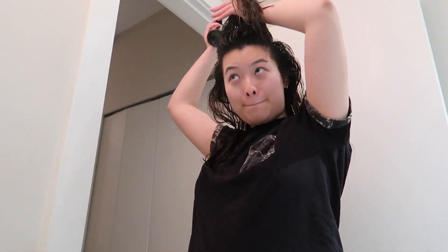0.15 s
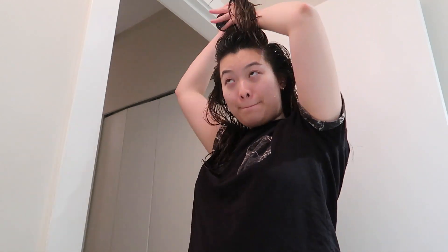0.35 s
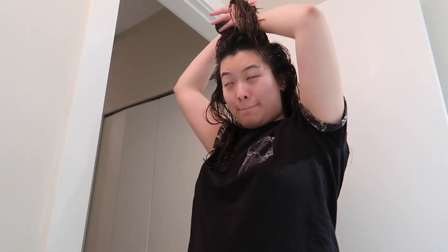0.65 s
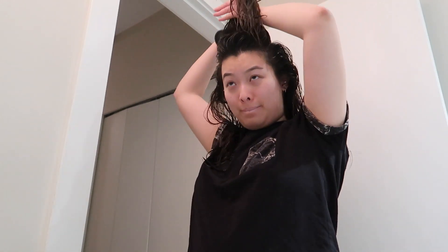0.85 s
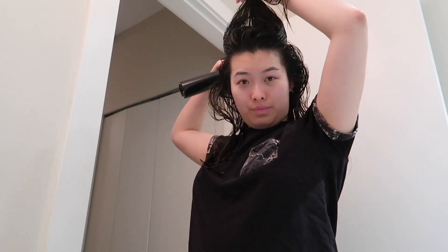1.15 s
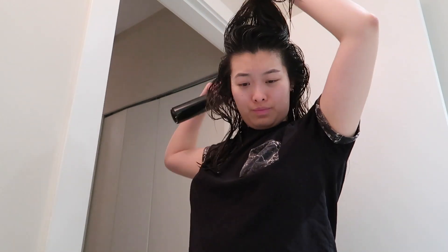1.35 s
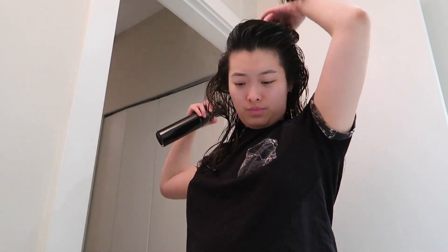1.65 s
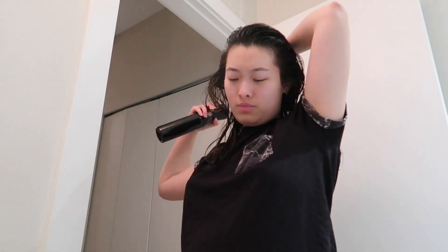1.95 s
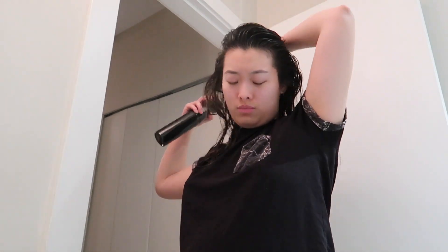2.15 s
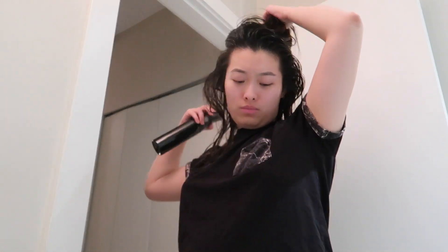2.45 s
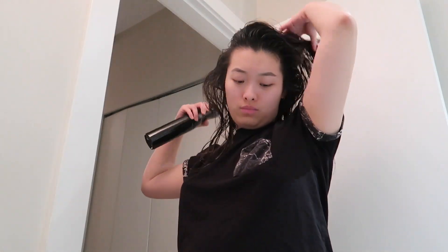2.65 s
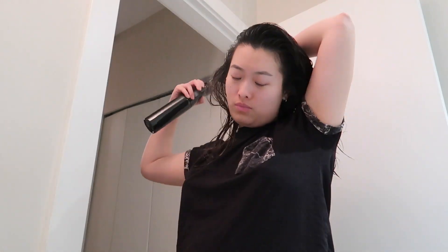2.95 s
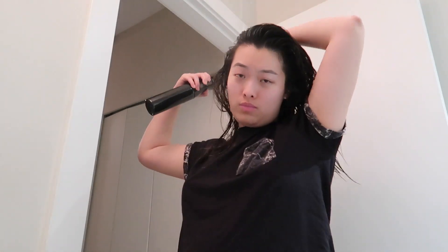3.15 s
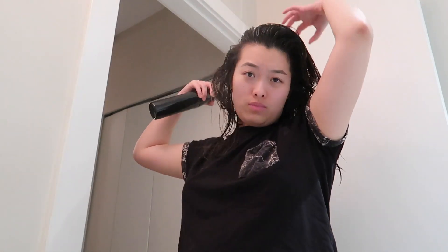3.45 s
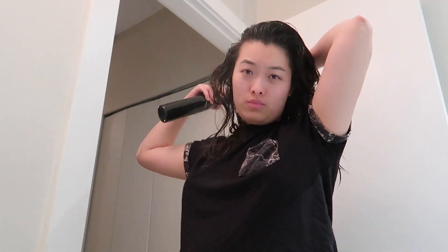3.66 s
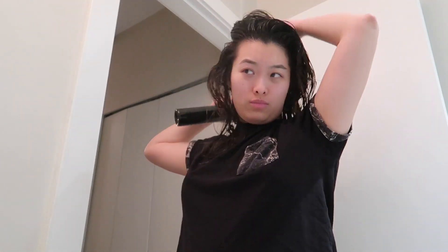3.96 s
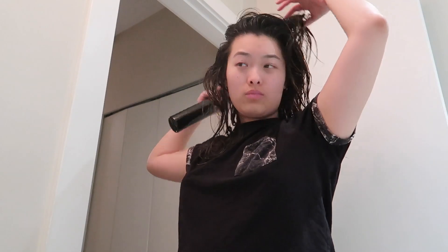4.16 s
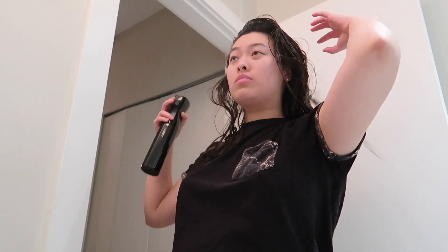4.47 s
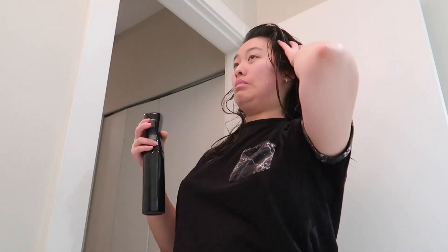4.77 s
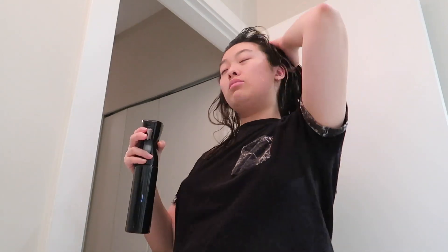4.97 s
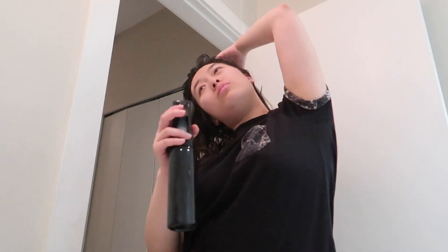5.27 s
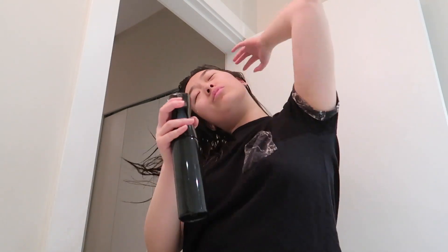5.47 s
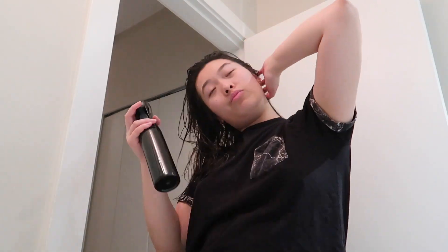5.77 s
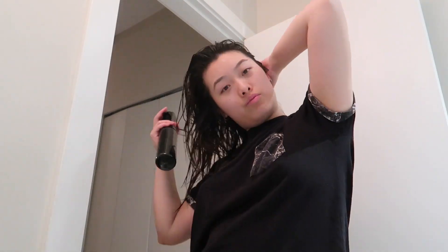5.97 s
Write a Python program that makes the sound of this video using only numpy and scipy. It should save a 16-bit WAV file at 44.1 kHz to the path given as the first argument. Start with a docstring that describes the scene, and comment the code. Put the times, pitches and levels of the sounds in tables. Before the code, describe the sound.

Close up in a small hard room, a spray bottle's trigger clicks and knocks around a steady soft mist hiss, with a faint motor hum.

```python
"""A small hard room: close in front of a mid-side microphone, a pump mister sprays fine water mist.
A ceiling fan motor hums in low, slowly drifting lines and rumbles as low noise, over the air noise of the room.
The trigger's plastic lever and piston click and knock: taps and rattles ring resonances of the hollow bottle.
The nozzle hisses as coloured noise, with sputter through the hollow and fine grit.
Clicks and knocks return from the room as decaying noise tails, separate in the mid and side capsules."""
import sys
import numpy as np
from scipy import signal
from scipy.fft import rfft, irfft, next_fast_len
from scipy.io import wavfile
from scipy.ndimage import uniform_filter1d, map_coordinates

SR = 44100
rng = np.random.default_rng(int(sys.argv[2]) if len(sys.argv) > 2 else 0)


def digitize_waveform(pressure):
    """Quantize a signal to 16-bit integers and store it at the path in sys.argv[1].

    Rows of a 2-D input are taken as channels; values are limited to [-1, 1].
    """
    field = np.atleast_2d(pressure).T
    bounded = np.clip(field, -1, 1)
    quanta = np.round(bounded * 32767).astype(np.int16)
    wavfile.write(sys.argv[1], SR, quanta)


N = 269873  # length [samples]

# Late decay of the room: (frequency [Hz], T60 [s])
ROOM_DECAY = [(300, 0.48), (1000, 0.46), (3000, 0.5), (10000, 0.26)]
# Capsule responses to clicks and knocks, mid then side: (frequency [Hz], gain [dB])
MID_CAPSULE = [(6000, -0.5), (10500, -8), (12500, -18), (15000, -46)]
SIDE_CAPSULE = [(300, -23), (1000, -23), (2500, -15), (3600, -14), (4200, -4), (5500, -1), (8000, 5),
                (13000, -1)]
TOP_HZ = 15466  # band limit of the recorder

# Spectral shape of the room air, mid then side: (frequency [Hz], relative level [dB])
AIR_MID = [(47, -55), (80, -9), (102, -9.5), (127, -9.5), (148, -10), (173, -12), (398, -15), (518, -19),
           (1070, -23), (1170, -22), (1460, -23.5), (4090, -32.5), (5800, -35.5), (11800, -46.5),
           (15300, -72)]
AIR_SIDE = [(12, -35), (20, -57), (136, -4), (531, -2.5), (593, -16), (721, -9.5), (2250, -17), (4510, -21),
            (11300, -32.5), (14100, -39), (15300, -61)]
# Fan motor lines: (frequency [Hz], mean level [dB rms], unsteadiness [dB], which also scales phase drift)
MOTOR_LINES = [(120, -43.5, 0.6), (57.5, -96, -2), (178, -70, 0)]
# Fan rumble over time: (time [s], level [dB])
RUMBLE_LEVEL = [(0, -58.5), (1.5, -56), (3, -61), (4.4, -58), (5.2, -53.5), (6.12, -58)]
# Spectral shape of the rumble: (frequency [Hz], relative level [dB])
RUMBLE_SPECTRUM = [(15, -34), (25, 11.5), (45, 2), (60, 15), (80, -21), (110, -47)]

# Trigger clicks: (time [s], blow level [dB], pitch stirred in the hollow [Hz], then relative to the blow
# hollow [dB], wall [dB], shoulder [dB], head [dB], and room tail relative to the direct sound [dB])
CLICKS = [(0.157, -41, 910, -8.5, -10, -14, -13.5, 8.5), (0.33, -32, 990, -10, -38, -17, -26, -3),
          (0.338, -26.5, 950, -1, -18, -9, -4, -1.5), (0.374, -33, 930, -4, -11.5, -17, -24, -1),
          (0.41, -32, 960, -7, -29, -26, -17, -3), (0.547, -34.5, 900, -10.5, -13, -20, -14.5, 4.5),
          (0.573, -27.5, 850, -8, -13.5, -20, -22, 2.5), (0.597, -33.5, 1180, -7, -26, -17, -17, 3),
          (0.717, -31.5, 850, -8.5, -12, -17, -19, 1), (0.738, -35.5, 850, -19, -15, -12, -20, 4),
          (0.781, -14.5, 880, -9.5, -12, -20, -19.5, 3), (0.82, -29.5, 1010, -6.5, -15, -14, -28, -1),
          (0.878, -35, 880, -3, -22, -25, -28, -7), (0.923, -37, 1060, -6.5, -16, -10.5, -19, 3),
          (1.045, -41.5, 830, -4.5, -4, -9, -3.5, 3), (1.081, -37.5, 964, -6.5, -18, -16, -21, 5),
          (1.151, -29, 1000, -14.5, -16, -13, -17, 4), (1.188, -38, 1060, -14, -18, -18, -8, 3),
          (1.247, -38.5, 910, -17, -21, -17, -7, 1), (1.384, -30, 1000, -6.5, -14.5, -9.5, -16, 7.5),
          (1.417, -36, 896, -17, -7, -18, -9, 2), (1.641, -25.5, 980, -14.5, -12, -11.5, -14, 4.5),
          (1.769, -28, 940, -17, -13, -7, -22, 5), (1.79, -29, 990, -9, -22, -20, -23, -1),
          (1.905, -31, 1020, -2.5, -25, -21, -21, -0.5), (1.941, -29.5, 1040, -13, -14, -13.5, -17, 8.5),
          (2.069, -29, 1150, -10.5, -12.5, -10, -22, 2), (2.196, -33, 1040, -3.5, -23, -12, -12, -0.5),
          (2.304, -34.5, 980, -10, -7.5, -14, -14, -2), (2.418, -32.5, 940, -12, -14, -37, -20, -1),
          (2.52, -26, 950, -13, -19, -18, -18, 6), (2.565, -27, 955, -8.5, -15, -12.5, -16, 3.5),
          (2.731, -33, 910, -7, -13, -14, -10, 0), (2.826, -25.5, 1090, -7, -14, -11, -13.5, 1.5),
          (2.905, -27, 960, -12.5, -15.5, -24, -13, 4), (3.032, -31, 1160, -7, -11.5, -16, -19, -8),
          (3.107, -31, 1000, -5, -25, -23, -14, 5.5), (3.158, -32.5, 910, -16, -8.5, -11, -9, 4),
          (3.29, -31, 940, -18.5, -28, -12, -17, 2), (3.324, -30, 910, -8.5, -17, -9, -25, -9),
          (3.367, -33, 990, -6.5, -17, -7, -15, 7), (3.402, -26, 980, -9, -19, -16, -12, 3),
          (3.56, -33.5, 1010, -8, -21, -18, -11, 7.5), (3.665, -29, 1130, -9.5, -15, -12, -28, 8.5),
          (3.861, -31, 925, -5.5, -14, -41, -28, 8.5), (3.958, -28, 1110, -9, -13.5, -13.5, -17, 6.5),
          (4.131, -35.5, 945, -3, -11, -22, -17, 5), (4.24, -34, 1140, -8, -28, -31, -21, 14.5),
          (4.262, -39, 980, -12, -24, -11, -12, 11), (4.287, -32, 980, -6.5, -11, -9.5, -12, 4),
          (4.31, -38.5, 990, -15, -10, -16, -10, 4.5), (4.692, -44, 861, -16, -8, -13, -18, 9),
          (4.709, -36.5, 1070, -6, -6.5, -22, -25, 0.5), (4.763, -32, 980, -6.5, -27, -17, -15, -1.5),
          (4.768, -37.5, 850, -8, -16, -16, -13.5, 5), (4.814, -38.5, 1320, -4.5, -11, -29, -21, 5.5),
          (4.819, -36.5, 1080, -14, -9.5, -26, -30, -7), (4.836, -41.5, 1090, -19, -5, -24, -22, -1),
          (4.928, -45, 830, -3.5, -26, -23, -12, 5), (5.222, -38, 1130, -9, -8, -20, -7.5, 1.5),
          (5.309, -32.5, 1040, -6.5, -5.5, -15, -15.5, -1), (5.321, -38, 920, -8, -24, -18, -15, 0),
          (5.422, -39.5, 1120, -10, -5.5, -12, -18, 2), (5.461, -34.5, 1020, -1.5, -9, -14, -21.5, -1.5),
          (5.526, -39, 1120, -4.5, -9, -6.5, -7, 0.5), (5.582, -44, 999, -13, -18, -18, -13, -1),
          (5.719, -43, 1150, -10, -26, -20, -12, 4), (5.789, -30, 875, -7, -19, -14, -14, 2),
          (5.795, -33, 800, -22, -18, -23, -12.5, 0), (5.905, -38.5, 869, -6.5, -13, -23, -17, 1),
          (5.966, -34.5, 1300, -6, -4, -11, -10.5, 4), (5.975, -39, 1450, -5, -3, -16, -11, -1.5)]
# Piston knocks in the bottle's air: (time [s], level [dB], pitch [Hz])
KNOCKS = [(0.573, -42, 570), (0.782, -36.5, 509), (1.214, -38.5, 308), (1.394, -42, 424),
          (1.651, -40.5, 407), (1.94, -47, 421), (2.569, -38.5, 426), (2.831, -42, 403),
          (3.105, -46.5, 424), (3.409, -39, 398), (3.674, -53, 448), (4.27, -62, 460)]
KNOCK_T60_S = 0.1
# Resonances of the bottle's hollow, wall, shoulder and base, then of the pump head, trigger spring
# and nozzle orifice: (frequency [Hz], width [Hz], relative gain per pass [dB])
HOLLOW = [(825, 56, -6), (905.5, 12.3, 4.5), (964, 56, -2.5), (990, 24, 5), (1040, 96, -8.5), (1141, 41, 1),
          (1248, 55, -11), (1361, 91, 0), (1473, 490, -5)]
WALL = [(1840, 140, -9), (2061, 42, 3.5), (2260, 106, -2.5), (2470, 65, -7)]
SHOULDER = [(2583, 175, 0.21), (2800, 266, -0.7), (3043, 323, -4)]
BASE = [(356, 137, -2.5), (443, 114, 5), (677, 78, -3.5)]
HEAD = [(3450, 560, 0), (4630, 1220, -3.5), (5300, 520, -6)]
SPRING = [(5700, 2400, -1.4), (9200, 11000, -0.66)]
ORIFICE = [(5660, 1040, -6.5)]
# Level added to each part on every click: hollow [dB], wall [dB], shoulder [dB], head [dB]
PART_TRIM = [0.33, 2.37, 3, 1.5]
REFERENCE_BLOW_DB = -35  # blow level at which the spring and wall levels are stated
BASE_DB, SPRING_DB = -15, -11  # base relative to the hollow, spring relative to the head at the reference
SPRING_GROWS = 0.7  # extra spring level per dB of harder blow [dB/dB]
WALL_THUD_DB = -5  # thud under the wall's ring at the reference blow
WALL_CLEARS = 0.6  # drop of the wall's thud per dB of harder blow [dB/dB]
PICK_HZ = 274  # width of the band of hollow modes that one click stirs
SCATTER_DB = 2  # spread of mode strengths from blow to blow, per pass
ONSET_S, CHATTER_S = 0.0022, 0.0046  # time constants of the rattle's rise and decay

# The jet opens fast, falters once, sags and shuts: (time [s], flow level before the layer gains [dB])
SPRAY = [(1.12, -75), (1.18, -53.5), (1.3, -54), (2.22, -55), (2.27, -59.5), (2.31, -54), (3.99, -54.5),
         (4.28, -57), (4.4, -89)]
# Spectral shape of the nozzle hiss, mid then side: (frequency [Hz], relative level [dB])
HISS_MID = [(290, -14), (500, -17), (675, -18.5), (980, -9), (1270, -10.5), (1460, -7.5), (1740, -11),
            (2060, -7.5), (2710, -5.5), (3700, -7.5), (4280, -11), (5400, -9), (6800, -15.5), (10500, -20),
            (12500, -35.5), (15300, -99)]
HISS_SIDE = [(410, -36), (700, -6), (1500, -27), (2420, -17), (2970, -14), (3800, 9.5), (5520, 12),
             (11400, 9), (12900, 11), (15300, -11)]


def amp(db):
    """Decibels to gain."""
    return 10 ** (np.asarray(db) / 20)


def unit(x):
    """Scaled to rms 1."""
    return x / np.sqrt(np.mean(x ** 2) + 1e-20)


def peak(x):
    """Scaled to peak 1."""
    return x / np.max(np.abs(x))


def along(points, hz):
    """(frequency [Hz], value) points read on a log frequency axis."""
    f, v = np.transpose(points)
    return np.interp(np.log(hz + 1), np.log(f + 1), v)


def wobble(rate):
    """A smooth random curve through a given number of knots a second."""
    knots = rng.standard_normal(int(N * rate / SR) + 4)
    return map_coordinates(knots, [np.arange(N) * rate / SR])


def filtered(x, response):
    """x shaped by a complex response of frequency."""
    m = next_fast_len(x.shape[-1] + 8192)
    spectrum = rfft(x, m) * response(np.fft.rfftfreq(m, 1 / SR))
    return irfft(spectrum, m)[..., :x.shape[-1]]


def rush(spectrum, patchy_db):
    """Coloured noise of rms 1, with smooth patches of random gain in time and frequency."""
    z = signal.stft(rng.standard_normal(N + 512), nperseg=512)[2]
    across_hz = uniform_filter1d(rng.standard_normal(z.shape), 6, 0)
    patches = unit(uniform_filter1d(across_hz, 10, 1))
    noise = signal.istft(z * amp(patchy_db * patches), nperseg=512)[1][:N]
    return unit(filtered(noise, lambda hz: amp(along(spectrum, hz))))


def ringing(modes, scatter_db, order=2):
    """Causal response of resonances struck at new strengths; order 2 passes twice for steep skirts."""
    gains = amp(scatter_db * rng.standard_normal(len(modes)))

    def response(f):
        total = 0
        for k, (centre, width, db) in enumerate(modes):
            resonance = 1j * f * width / (centre * centre - f * f + 1j * f * width)
            total = total + (-1) ** k * gains[k] * amp(db) * resonance  # signs alternate
        return total ** order
    return response


def picked(modes, hz, width_hz, scatter_db, thud_db):
    """Narrow modes, of which a blow stirs those near hz most, over a short thud of the same band."""
    fine = ringing(modes, scatter_db, order=1)
    broad = ringing([(hz, width_hz, 0)], 0, order=1)
    return lambda f: (fine(f) + amp(thud_db) * broad(f)) * broad(f)


def place_in_room(out, s, blow, wet_db):
    """Adds a blow: direct sound, then near walls and a fresh diffuse tail in the mid and side capsules."""
    hz, t, z = signal.stft(rng.standard_normal((2, len(blow))), SR, nperseg=256)
    late = amp(-60 * t / along(ROOM_DECAY, hz)[:, None])
    early = amp(-1 - 60 * t / 0.19)  # near walls, T60 0.19 s
    tail = signal.istft(z * (late + early), SR, nperseg=256)[1]
    tail = np.pad(tail, ((0, 0), (round(0.0045 * SR), 0)))  # 4.5 ms before the first return
    tail *= amp(wet_db) / np.linalg.norm(tail)
    direct = blow * np.array([[1], [0.5]])
    heard = direct + signal.fftconvolve(blow[None], tail, axes=1)[:, :len(blow)]
    start = round(s * SR)
    out[:, start:start + len(blow)] += heard


def fan():
    """Fan motor in the mid only: slowly drifting hum lines and low rumble, over wide air noise of the room."""
    t = np.arange(N) / SR
    hum = np.zeros(N)
    for hz, db, drift_db in MOTOR_LINES:
        level = np.sqrt(2) * amp(db + drift_db * wobble(7.6))
        hum += level * np.sin(2 * np.pi * hz * t + 0.84 * drift_db * wobble(3.34))
    s, rumble_db = np.transpose(RUMBLE_LEVEL)
    rumble = amp(np.interp(t, s, rumble_db)) * rush(RUMBLE_SPECTRUM, patchy_db=1.5)
    air_mid = amp(-54.5) * rush(AIR_MID, patchy_db=1.1)
    air_side = amp(-56.5) * rush(AIR_SIDE, patchy_db=1.0)
    return np.array([hum + rumble + air_mid, air_side])


def click(db, hz, part_db):
    """A plastic contact: a tap, then a brief noisy rattle, ringing the parts of bottle and trigger."""
    t = np.arange(int(0.4 * SR)) / SR
    tap = 1.0 * (t == 0)
    rattle = rng.standard_normal(len(t)) * np.exp(-t / CHATTER_S) * (1 - np.exp(-t / ONSET_S))
    harder_db = db - REFERENCE_BLOW_DB
    wall_thud_db = WALL_THUD_DB - WALL_CLEARS * harder_db
    hollow_db, wall_db, shoulder_db, head_db = db + np.add(part_db, PART_TRIM)
    spring_db = head_db + SPRING_DB + SPRING_GROWS * harder_db
    parts = [  # level, excitation, resonances
        (hollow_db, tap, picked(HOLLOW, hz, PICK_HZ, SCATTER_DB, thud_db=-6.5)),
        (wall_db, tap, picked(WALL, 2050, 530, SCATTER_DB, wall_thud_db)),
        (shoulder_db, tap + 0.21 * rattle, ringing(SHOULDER, SCATTER_DB, order=1)),
        (head_db, 0.52 * tap + 0.46 * rattle, ringing(HEAD, scatter_db=1.5, order=1)),
        (hollow_db + BASE_DB, tap, ringing(BASE, scatter_db=1.0)),
        (spring_db, 0.4 * tap + 0.34 * rattle, ringing(SPRING, 0, order=1))]
    return sum(amp(level) * peak(filtered(push, response)) for level, push, response in parts)


def knock(db, hz):
    """The piston knocks the bottle's air: a decaying sine with a very short rise."""
    t = np.arange(int(0.4 * SR)) / SR
    rise = 1 - np.exp(-t / 0.00017)
    return amp(db) * np.sin(2 * np.pi * hz * t) * amp(-60 * t / KNOCK_T60_S) * rise


def trigger():
    """Clicks and knocks of the trigger, with the room, through the mid and side capsule responses."""
    out = np.zeros((2, N + SR))
    for s, db, hz, *part_db, wet_db in CLICKS:
        place_in_room(out, s, click(db, hz, part_db), wet_db)
    for s, db, hz in KNOCKS:
        place_in_room(out, s, knock(db, hz), wet_db=1)
    return filtered(out[:, :N], lambda hz: amp([along(MID_CAPSULE, hz), along(SIDE_CAPSULE, hz)]))


def nozzle():
    """Turbulent hiss of the jet; the pressure flutters and liquid sputters through the bottle's hollow."""
    s, db = np.transpose(SPRAY)
    flow_db = np.interp(np.arange(N) / SR, s, db, left=-120, right=-120)
    flow = amp(flow_db + 0.66 * wobble(16))
    spits = amp(4 * wobble(60)) * rng.standard_normal(N)
    sputter = unit(filtered(spits, picked(HOLLOW, 983, 330, scatter_db=1, thud_db=-22.5)))
    drops = amp(8 * wobble(200)) * rng.standard_normal(N)
    grit = filtered(drops, ringing([*SHOULDER, *ORIFICE], scatter_db=0.5, order=1))
    grit = unit(filtered(grit, lambda hz: amp(along(MID_CAPSULE, hz))))
    hiss = rush(HISS_MID, patchy_db=1.8)
    mid = amp(8.0) * hiss + amp(-1.1) * sputter + amp(-7.0) * grit
    side = amp(4.5) * rush(HISS_SIDE, patchy_db=1.8)
    return flow * np.array([mid, side])


def scene():
    """Mid and side capsules, matrixed to left and right."""
    mid, side = fan() + trigger() + nozzle()
    return np.array([mid + side, mid - side])


def record(dry):
    """The recorder passes nothing at or above its band limit."""
    return filtered(dry, lambda hz: hz < TOP_HZ)


dry = scene()
out = record(dry)
digitize_waveform(out)
```